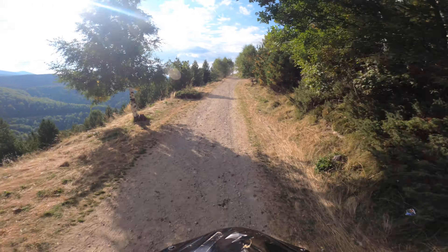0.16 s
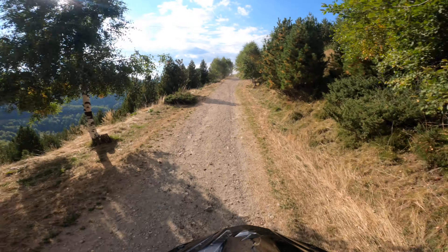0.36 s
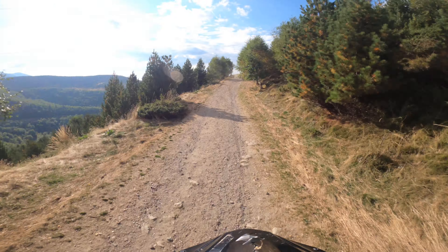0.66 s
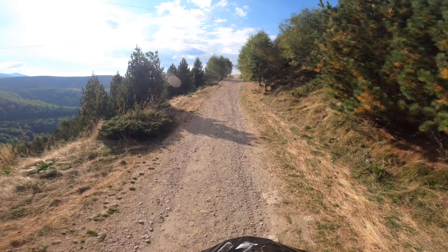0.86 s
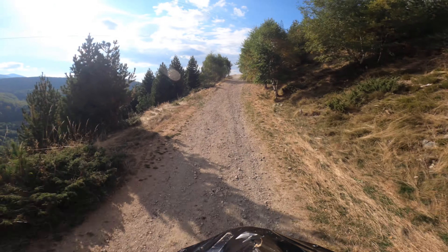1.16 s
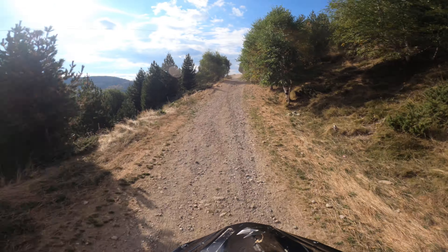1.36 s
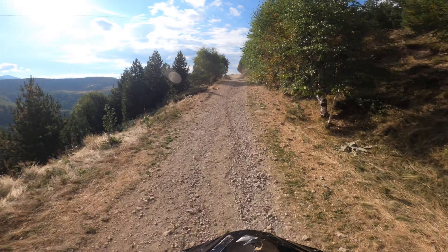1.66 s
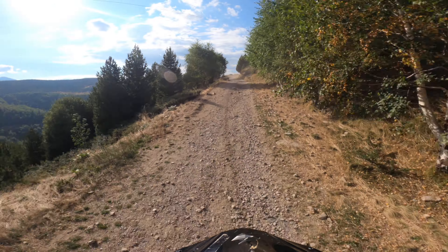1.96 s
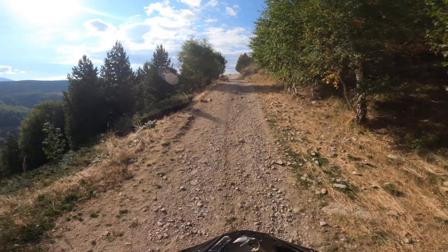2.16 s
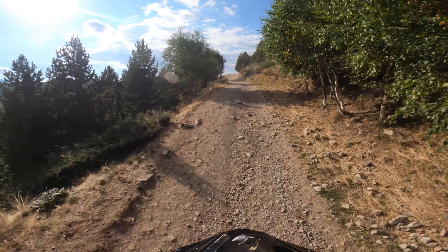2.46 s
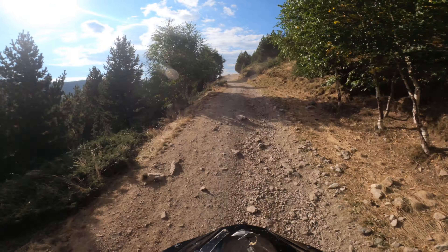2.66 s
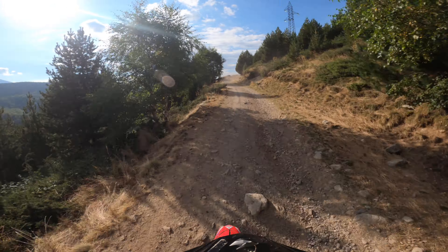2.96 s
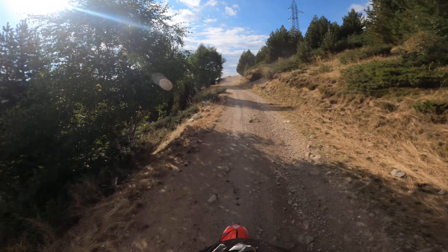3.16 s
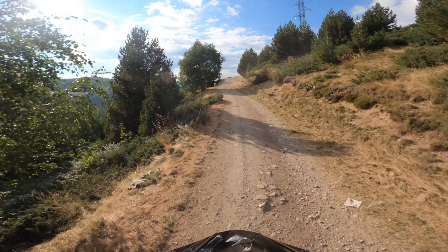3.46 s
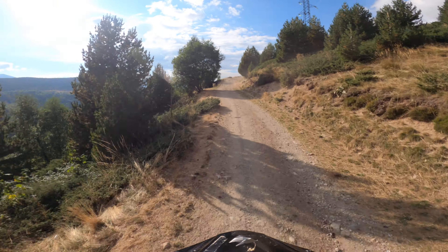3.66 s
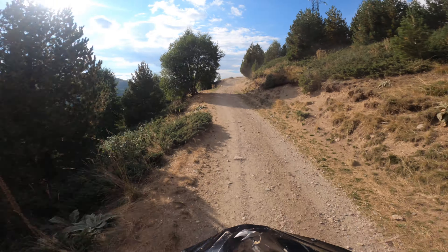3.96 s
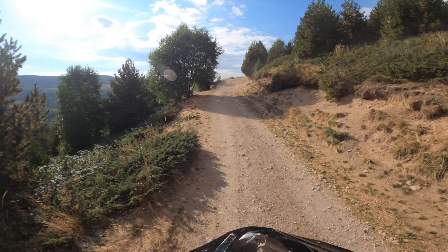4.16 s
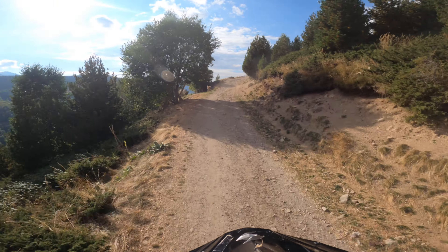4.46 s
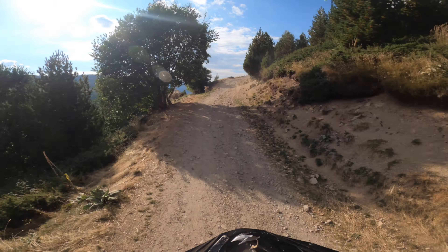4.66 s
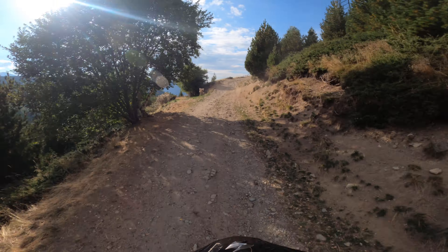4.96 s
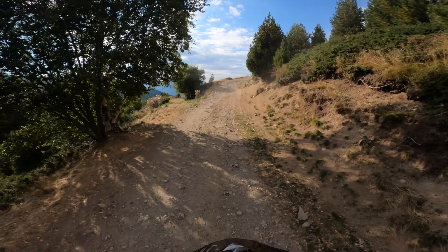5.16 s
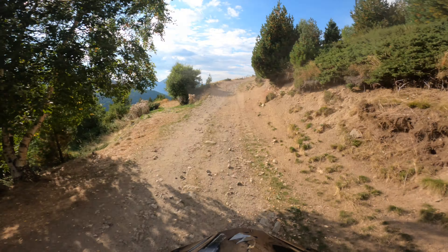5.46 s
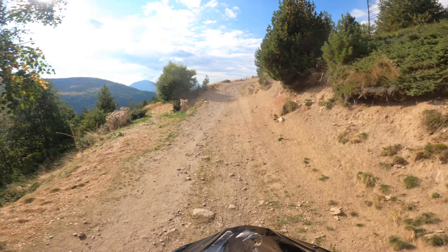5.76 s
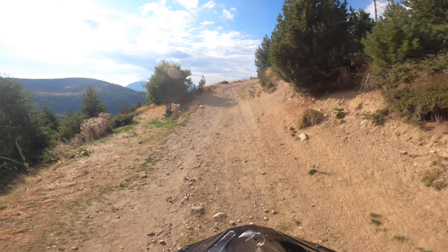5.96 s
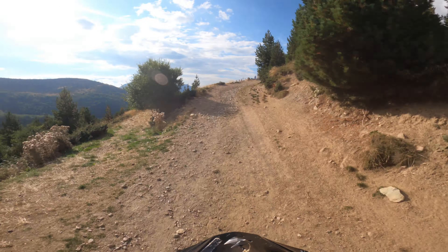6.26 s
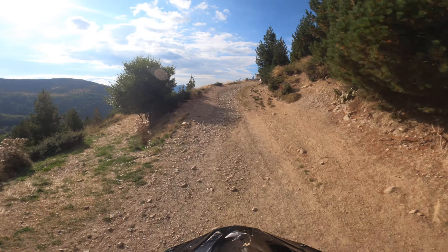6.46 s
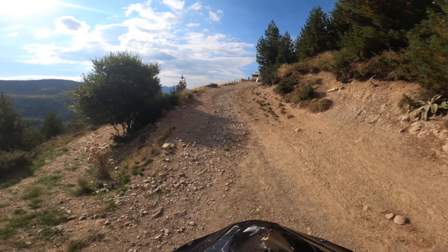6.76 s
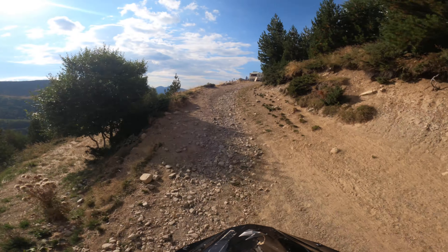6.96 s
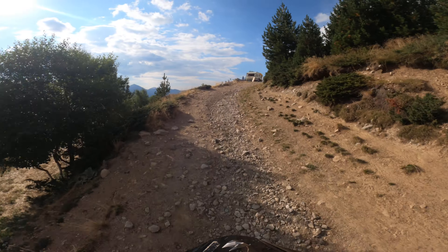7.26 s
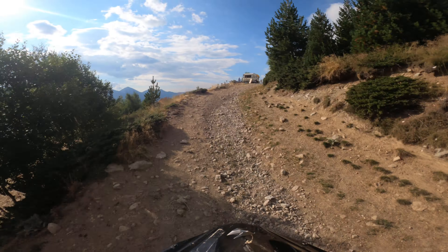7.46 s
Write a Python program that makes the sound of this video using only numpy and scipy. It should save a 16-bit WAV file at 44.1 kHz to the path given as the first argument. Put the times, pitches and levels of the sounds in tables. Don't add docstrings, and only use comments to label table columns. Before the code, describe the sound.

Close, muffled dirt bike engine burbles uphill on rough gravel, briefly revving into a hum, then slowing and stumbling as stones clack underneath.

```python
import sys
import numpy as np
from scipy import signal
from scipy.io import wavfile
from scipy.ndimage import uniform_filter1d

SR = 44100
rng = np.random.default_rng(int(sys.argv[2]) if len(sys.argv) > 2 else 0)


def gain_from_db(level_db):
    decades = np.asarray(level_db, float) / 20
    return 10 ** decades


def wav_record(signal):
    frames = np.transpose(np.atleast_2d(signal))
    bounded = np.clip(frames, -1, 1)
    quanta = np.round(bounded * 32767).astype(np.int16)
    wavfile.write(sys.argv[1], SR, quanta)


N = 336042

# f/Hz, level/dB per Hz
WIND_SPECTRUM = [(12, -14), (25, -7.5), (45, -2), (100, -3.5), (140, -5), (200, -8.5), (270, -8.5),
                 (340, -10.5), (400, -19), (520, -27), (900, -40)]
# t/s, wind level change/dB
GUSTS = [(.1, 8), (.74, 0), (.87, 2), (2.25, 1), (3.33, 2), (3.5, 6), (3.82, -4.5), (4.01, 2), (6.28, -0.5),
         (6.37, -0.5), (6.52, 6), (6.58, -4), (6.83, 4), (7.57, 8)]
GUST_SIDE_S = 0.1

# start t/s, rattle level/dB, brightness/dB per octave, wind level/dB
GROUND = [(0, -48.5, 5, -24.5), (.64, -43, 1.5, -19), (1.15, -44, -2, -20.5), (2.0, -44, 2.5, -19.5),
          (2.98, -43, 2.5, -21.5), (3.58, -46, 2.5, -17.5), (4.0, -47.5, 1.2, -19), (5.0, -47, 0.5, -21),
          (5.5, -44.5, 3.5, -19), (6.2, -43.5, -3, -18.5), (6.45, -47.5, 0.5, -20), (7.1, -46.5, 1, -23)]
# start t/s, end t/s, roughness/0-1
LOOSE_GROUND = [
    (.62, .76, .33),
    (2.0, 2.8, .12),
    (2.85, 3.0, .25),
    (3.45, 3.82, .18),
    (5.0, 5.5, .2),
    (5.5, 6.1, .28),
    (6.1, 6.58, .24),
    (7.2, 7.62, .16),
]
FIRM_ROUGHNESS, CHANGE_S = .08, .09

# t/s, peak level/dB, f/Hz
KNOCKS = [(0.381, -18, 620), (0.509, -16, 650), (1.97, -12.5, 636), (1.991, -18, 630), (2.515, -13, 1114),
          (4.776, -25, 604), (5.447, -17, 630), (5.54, -16, 640), (5.597, -14, 620), (5.629, -14, 504),
          (5.688, -6.5, 636), (5.751, -7.5, 622), (5.82, -14, 620), (5.884, -11, 640), (5.95, -14.5, 625),
          (6.018, -14, 635), (6.072, -8.5, 630), (6.239, -15, 960), (6.31, -9.5, 635), (6.5, -17, 780),
          (6.815, -15, 960), (6.99, -19, 950)]
KNOCK_T60_S, KNOCK_DB = 0.052, -3.5

# f/Hz, level/dB per Hz
RATTLE_SPECTRUM = [(300, -8), (450, -4.5), (620, -2), (800, -5), (1400, -9.5), (1750, -18.5), (2200, -18.5),
                   (2800, -21.5), (4000, -33.5), (5500, -40), (7600, -51.5), (9000, -68), (11000, -73.5),
                   (13500, -75.5), (15600, -87.5)]
# t/s, rattle level change/dB
JOLTS = [(.74, 2), (2.27, 0.5), (2.88, 2), (3.47, 3), (3.53, -0.5), (3.73, 4.5), (5.1, -2), (5.3, 0),
         (5.42, 2), (5.5, 0.5), (5.62, 1), (5.87, 3), (6.0, 0.5), (6.28, 3.5), (6.41, 0.5), (6.57, 3),
         (6.65, 3.5), (6.83, 4), (7.5, 1)]
# t/s, brightness change/dB per octave
SPRAYS = [(.07, 5), (.16, 4.5), (.76, 3), (.97, 2.5), (1.62, -1.5), (1.9, 1.5), (2.43, -6.5), (3.3, 0),
          (3.53, 4), (3.62, 3), (4.5, 3.5), (4.65, 3), (4.9, 3), (5.25, 2), (5.45, 0.5), (5.6, 1),
          (5.87, 1), (6.0, 1.5), (6.25, 2.5), (6.83, 2), (7.3, -1.5), (7.5, 0)]
JOLT_SIDE_S, SPRAY_SIDE_S = 0.035, .06

# t/s, firing rate/Hz
FIRING_RATE = [(0.0, 42.49), (0.15, 41.96), (0.23, 39.75), (0.53, 41.9), (0.85, 42.63), (1.66, 44.6),
               (2.14, 43.1), (2.67, 44.51), (2.92, 42.83), (3.13, 49.18), (3.31, 48.54), (3.5, 50.87),
               (3.62, 40.92), (4.11, 40.38), (5.16, 35.72), (5.55, 33.03), (6.37, 29.21), (7.62, 30.91)]
# t/s, firing rate change/Hz
SPEED_BLIPS = [(0.41, -0.53), (0.53, -2.45), (0.74, 2.87), (0.89, 0.39), (1.16, 0.44), (1.52, 0.24),
               (1.64, 3.49), (1.85, 1.17), (1.97, 0.49), (2.21, 1.96), (2.9, 0.9), (3.07, 0.2), (3.19, 0.7),
               (3.3, -0.7), (3.41, 2.04), (3.8, 4.7), (4.07, 0.34), (4.37, -0.16), (4.76, 0.38),
               (5.72, 0.6), (5.87, 0.69), (6.12, 0.79), (6.35, 0.95), (6.62, 2.31), (7.13, -0.93),
               (7.52, -1.07)]
SPEED_BLIP_SIDE_S = .1
FIRST_TURN_CYCLES = -.335
# start t/s, bark level/dB, air-box level/dB, crank shake level/dB, silencer echo/0-1
ENGINE = [(0, -19, -32.5, -26.5, 0.6), (.64, -18, -29.5, -24, 0.1), (1.4, -18, -29, -26.5, .2),
          (1.55, -17.5, -31.5, -24, 0.3), (1.9, -19.5, -28, -27, .1), (2.98, -14.5, -46, -18.5, 0.2),
          (3.43, -20.5, -35.5, -18.5, 0.4), (3.62, -21.5, -33.5, -32, 0.4), (3.8, -18.5, -33, -29, 0.7),
          (4.6, -19, -36, -27, 0.5), (5.05, -20, -34.5, -22, 0.7), (5.42, -22.5, -33, -22.5, 0.2),
          (6.3, -21.5, -25.5, -23, 0.7), (6.5, -20, -26.5, -30, 0.7), (6.72, -15, -28, -36.5, 0.8)]
# start t/s, coasting/0-1, pulling/0-1, lugging/0-1
THROTTLE = [
    (0, 1, 0, 0),
    (.62, 0, 1, 0),
    (3.8, 1, 0, 0),
    (5.75, 0, 0, 1),
]

# f/Hz, width/Hz, level/dB, slope/dB per Hz of firing rate
AIR_BOX = [(630, 82, -1, -0.1), (788, 160, -3.5, 1.37), (951, 70, -8, -0.55), (1127, 83, 0.5, 0.04),
           (1412, 110, -7.5, 0.97), (2650, 280, -24, 1.64)]
# first angle/cycles, level/dB, second angle/cycles, level/dB
COASTING_STRIKES = [(.46, 9.5, .74, -7.5), (.44, 4.5, 0.94, -10.5), (.49, 2.5, 0.22, -14.5),
                    (0.56, 2.5, 0.29, -4.5), (0.34, 1.5, .73, 0), (0.27, -3.5, .78, 0)]
PULLING_STRIKES = [(.1, -4, .68, 0), (0.72, -1.5, 0.06, -1), (0.9, 0, 0.82, -8), (.66, 5, 0.84, -12),
                   (.49, 5, 0.67, -10.5), (.52, 0, .0, -0.5)]
LUGGING_STRIKES = [(0.021, -8, 0.78, -4.5), (.16, 4.5, 0.57, 3), (0.602, -1.5, 0.92, -5),
                   (0.521, -6, 0.81, -2), (0.539, 4.5, 0.66, 3.5), (.6, 4, .75, -2)]
TAP_HALF_S, TAP_OVER_HISS_DB, TAP_CUT_HZ = .0015, 7, 3430
WHISTLE_HZ, WHISTLE_WIDTH_HZ, WHISTLE_DB = 1140, 36, -9.5

# t/s, sixth order level/dB, seventh order level/dB
SINGING = [(0, -35, -15), (.13, -27, -34), (.2, -48.5, -49), (1.45, -52, -52), (1.55, -26, -19),
           (1.65, -22, -13.5), (1.72, -48.5, -51.5), (2.9, -51.5, -50), (2.95, -28.5, -34),
           (3.02, -8.5, -43), (3.2, -11, -40), (3.38, -11, -41), (3.45, -46, -50)]
# multiple of firing rate, level/dB re sixth
SUNG_ABOVE = [(8, -17), (12, -26), (15, -21)]
SUNG_LEAN_RAD = 0.3

# multiple of firing rate, level/dB
CRANK_ORDERS = [(1, -11), (2, -2.5), (3, -7), (4, -1.5)]
# f/Hz, width/Hz, level/dB, slope/dB per Hz of firing rate
OVERTONES = [(603, 91, -12, 0), (745, 67, -16, 0.5), (469.6, 110, -13.5, 0)]
OVERTONE_LAG_S = (.003, -.004, .001)
UPPER_DB, UPPER_ROUGH_DB, UPPER_FOLLOWS = -20.5, 8, 0.7
BARK_HZ, BARK_HALF_S = 284.2, 0.0026
LUGGED_HZ, LUGGED_HALF_S = 295, 0.0023
SWING_LEAN_RAD = 0.3
ECHO_MS, ECHO_MS_PER_HZ = 6.49, 0.065
THUD_HZ, THUD_HALF_S, THUD_LEAD_MS = 160, 0.0028, .5
THUD_DB, THUD_FOLLOWS, THUD_COAST_DB = -23, 0.76, 3
INTAKE_HZ, INTAKE_HALF_S, INTAKE_DB = 76, 0.002, -37.5
STUMBLE_S = (5.5, 5.6, 6.1, 6.2)
STRONG_AT_S, STUMBLE_DB = 5.78, 4


def rms_one(x):
    return x / np.sqrt(np.mean(x ** 2) + 1e-20)


def in_time(rows):
    s, *columns = np.transpose(rows)
    return [np.interp(np.arange(N) / SR, s, c) for c in columns]


def by_stretch(rows):
    s, *columns = np.transpose(rows)
    row = np.maximum(np.searchsorted(s, np.arange(N) / SR, "right") - 1, 0)
    return [uniform_filter1d(c[row], size=int(CHANGE_S * SR)) for c in columns]


def blips(rows, side_s):
    now = np.arange(0, N + 40, 40) / SR
    total = sum(height * np.clip(1 - np.abs(now - s) / side_s, 0, 1) for s, height in rows)
    return np.interp(np.arange(N) / SR, now, total)


def drift(rate_hz):
    r = np.exp(-80 * np.pi * rate_hz / SR)
    slow = signal.lfilter([1], [1, -2 * r, r * r], rng.standard_normal(N // 40 + 2002))[2000:]
    return np.interp(np.arange(N) / 40, np.arange(len(slow)), rms_one(slow))


def resonate(x, hz, width_hz):
    r = np.exp(-np.pi * width_hz / SR)
    zeros = np.array([1, 0, -1]) * (1 - r * r) / 2
    poles = [1, -2 * r * np.cos(2 * np.pi * hz / SR), r * r]
    return signal.lfilter(zeros, poles, x)


def lowpass(x, order, hz):
    return signal.sosfilt(signal.butter(order, hz, fs=SR, output="sos"), x)


def banded_noise(spectrum, shared_db, own_db, own_rate_hz, tilt_db=0, evened=0):
    hz, level_db = np.transpose(spectrum)
    edges = np.exp(np.arange(np.log(hz[0]), np.log(hz[-1]), np.log(2) / 3))
    white = rng.standard_normal((2, N + 9000))
    out = 0
    for k, (low, high) in enumerate(zip(edges, edges[1:])):
        sos = signal.butter(2, [low, high], "band", fs=SR, output="sos")
        band = signal.sosfilt(sos, white[k % 2])[-N:]
        if evened:
            power = uniform_filter1d(rms_one(band) ** 2, int(3 * SR / low))
            band = rms_one(band / (power + .05) ** (evened / 2)) * np.std(band)
        centre_db = np.interp(np.log(low * high) / 2, np.log(hz), level_db)
        octaves_up = np.clip(np.log2(high / 3000), 0, 1.5)
        out = out + band * gain_from_db(centre_db + shared_db + own_db * drift(own_rate_hz) + tilt_db * octaves_up)
    return rms_one(out)


def roughness():
    now, out = np.arange(N) / SR, np.full(N, FIRM_ROUGHNESS)
    for start, end, rough in LOOSE_GROUND:
        out[(now >= start) & (now < end)] = rough
    return uniform_filter1d(out, size=int(CHANGE_S * SR))


def once_a_cycle(turn, at_cycles, rough, slip_s, spread_db):
    at = np.flatnonzero(np.diff(np.floor(turn - at_cycles)) > 0)
    luck = rng.standard_normal((400, 2))[:len(at)]
    moved = np.clip(at + (luck[:, 0] * rough[at] * slip_s * SR).astype(int), 0, N - 1)
    out = np.full(N, 1e-18)
    out[moved] = gain_from_db(luck[:, 1] * rough[at] * spread_db)
    return out


def swings(clicks, hz, half_s):
    s = np.arange(-600, 601) / SR
    swing = -np.sin(2 * np.pi * hz * s + SWING_LEAN_RAD) * np.exp(-.5 * (s / half_s) ** 2)
    return signal.fftconvolve(clicks, swing, "same")


def stroke(turn, at_cycles, width_cycles):
    away = (turn - at_cycles + .5) % 1 - .5
    return np.exp(-.5 * (away / width_cycles) ** 2)


def wind(wind_db):
    noise = banded_noise(WIND_SPECTRUM, .8 * drift(8), own_db=.7, own_rate_hz=8, evened=.85)
    return gain_from_db(wind_db + .7) * noise


def knocks():
    out, s = np.zeros(N + SR), np.arange(4000) / SR
    decay = gain_from_db(-60 * s / KNOCK_T60_S) * np.clip(s / .0035, 0, 1)
    for start, db, hz in KNOCKS:
        first = int(start * SR)
        out[first:first + len(s)] += gain_from_db(db + KNOCK_DB) * np.sin(2 * np.pi * hz * s) * decay
    return out[:N]


def rattle(turn, rattle_db, bright_db):
    beat_db = .9 * stroke(turn, .55, .07) + .8 * stroke(turn, .03, .06) + 1.1 * drift(9)
    noise = banded_noise(RATTLE_SPECTRUM, beat_db, own_db=1.0, own_rate_hz=18, tilt_db=bright_db)
    return gain_from_db(rattle_db + 16.5) * noise


def air_box(turn, per_s, rough, box_db, throttle):
    hiss, honk = rng.standard_normal(N), 0
    for k, (hz, width_hz, db, slope_db) in enumerate(AIR_BOX):
        taps = 0
        for share, strikes in zip(throttle, (COASTING_STRIKES, PULLING_STRIKES, LUGGING_STRIKES)):
            for at_cycles, tap_db in np.reshape(strikes[k], (2, 2)):
                clicks = once_a_cycle(turn, at_cycles, rough, slip_s=.0005, spread_db=9)
                taps = taps + share * gain_from_db(tap_db) * clicks
        struck = resonate(swings(taps, hz, TAP_HALF_S), hz, width_hz)
        gate = 0.34 + rms_one(uniform_filter1d(taps, size=160))
        gated = resonate(hiss * gate, hz, width_hz)
        level = gain_from_db(db + slope_db * (per_s - 43.0)) * np.sqrt(width_hz)
        honk = honk + level * (gain_from_db(TAP_OVER_HISS_DB) * rms_one(struck) + rms_one(gated))
    honk = rms_one(lowpass(honk, 2, TAP_CUT_HZ))
    whistle = resonate(resonate(hiss[::-1], WHISTLE_HZ, WHISTLE_WIDTH_HZ), WHISTLE_HZ, 120)
    pulling = throttle[1]
    return gain_from_db(box_db) * honk + gain_from_db(box_db + WHISTLE_DB) * pulling * rms_one(whistle)


def singing(turn):
    sixth_db, seventh_db = in_time(SINGING)
    angle = 2 * np.pi * (turn + .08)
    sixth = np.sin(6 * angle + SUNG_LEAN_RAD)
    seventh = np.sin(7 * angle + SUNG_LEAN_RAD)
    above = sum(gain_from_db(db) * np.sin(round(k) * angle + SUNG_LEAN_RAD) for k, db in SUNG_ABOVE)
    return -gain_from_db(sixth_db) * (sixth + above) - gain_from_db(seventh_db) * seventh


def crank_shake(turn, shake_db):
    angle = 2 * np.pi * (turn + .77)
    return sum(gain_from_db(shake_db + db + 1.0 * drift(2.7)) * np.sin(k * angle) for k, db in CRANK_ORDERS)


def intake_thump(turn, rough, pulling):
    clicks = once_a_cycle(turn, .42, rough, slip_s=.0011, spread_db=8)
    return gain_from_db(INTAKE_DB) * pulling * rms_one(swings(clicks, INTAKE_HZ, INTAKE_HALF_S))


def stumble(turn):
    cycle = np.floor(turn + .33)
    depth = np.interp(np.arange(N) / SR, STUMBLE_S, (0, 1, 1, 0))
    since_strong = cycle - cycle[int(STRONG_AT_S * SR)]
    return gain_from_db(STUMBLE_DB * depth * np.cos(np.pi * since_strong))


def pipe_overtones(blow, per_s, rough, bark_db, pulling):
    upper = 0
    for (hz, width_hz, db, slope_db), lag_s in zip(OVERTONES, OVERTONE_LAG_S):
        shifted = np.roll(blow, int(lag_s * SR))
        ring = resonate(resonate(shifted, hz, width_hz), hz, 2 * width_hz)
        upper = upper + gain_from_db(db + slope_db * (per_s - 45.0)) * rms_one(ring)
    level_db = UPPER_DB + UPPER_ROUGH_DB * rough + UPPER_FOLLOWS * (bark_db + 14)
    return gain_from_db(level_db) * upper * (0.45 + 0.3 * pulling)


def exhaust(turn, per_s, rough, bark_db, box_db, echo, coasting, pulling):
    blow = stumble(turn) * once_a_cycle(turn, -.08, rough, slip_s=.0011, spread_db=8)
    free = coasting + pulling
    direct = free * swings(blow, BARK_HZ, BARK_HALF_S) + (1 - free) * swings(blow, LUGGED_HZ, LUGGED_HALF_S)
    delay_ms = ECHO_MS + ECHO_MS_PER_HZ * (per_s - 40)
    now = np.arange(N)
    echoed = direct + echo * np.interp(now - delay_ms * SR / 1000, now, direct)
    bark = rms_one(echoed * np.sqrt(40 / per_s / (1 + echo ** 2)))
    early = np.roll(blow, -int(THUD_LEAD_MS * SR / 1000))
    thud = rms_one(np.sqrt(40 / per_s) * swings(early, THUD_HZ, THUD_HALF_S))
    thud_db = THUD_DB + THUD_FOLLOWS * (box_db + 31.5) + THUD_COAST_DB * coasting
    pipe = gain_from_db(bark_db) * bark + gain_from_db(thud_db - 20 * rough) * thud
    return lowpass(pipe, 3, 430) + pipe_overtones(blow, per_s, rough, bark_db, pulling)


def scene():
    per_s, rough = in_time(FIRING_RATE)[0] + blips(SPEED_BLIPS, SPEED_BLIP_SIDE_S), roughness()
    turn = FIRST_TURN_CYCLES + np.cumsum(per_s) / SR
    bark_db, box_db, shake_db, echo = by_stretch(ENGINE)
    rattle_db, bright_db, wind_db = by_stretch(GROUND)
    throttle = by_stretch(THROTTLE)
    coasting, pulling, _ = throttle
    air = wind(wind_db + blips(GUSTS, GUST_SIDE_S))
    gear = rattle(turn, rattle_db + blips(JOLTS, JOLT_SIDE_S), bright_db + blips(SPRAYS, SPRAY_SIDE_S))
    gear = gear + knocks()
    engine = air_box(turn, per_s, rough, box_db, throttle) + singing(turn)
    engine = engine + crank_shake(turn, shake_db) + intake_thump(turn, rough, pulling)
    engine = engine + exhaust(turn, per_s, rough, bark_db, box_db, np.clip(echo, 0, 1), coasting, pulling)
    return (air + gear + engine)[None]


def low_pass(x):
    return signal.sosfilt(signal.butter(12, 15700, fs=SR, output="sos"), x)


def record(dry):
    over_db = np.maximum(20 * np.log10(np.abs(dry[0]) + 1e-9) + 6.5, 0)
    fall_db = 250 * np.arange(N) / SR
    held_db = np.maximum.accumulate(over_db + fall_db) - fall_db
    ahead_db = np.r_[held_db[80:], np.full(80, held_db[-1])]
    smooth_db = uniform_filter1d(uniform_filter1d(ahead_db, size=110), size=90)
    held = np.tanh(dry * gain_from_db(-.65 * smooth_db))[0]
    housing = signal.butter(2, 9500, fs=SR, output="sos")
    settled = signal.sosfilt_zi(housing) * .65 * held[0]
    housed = signal.sosfilt(housing, held, zi=settled)[0]
    return low_pass(housed[None])


dry = scene()
out = record(dry)
wav_record(out)
```